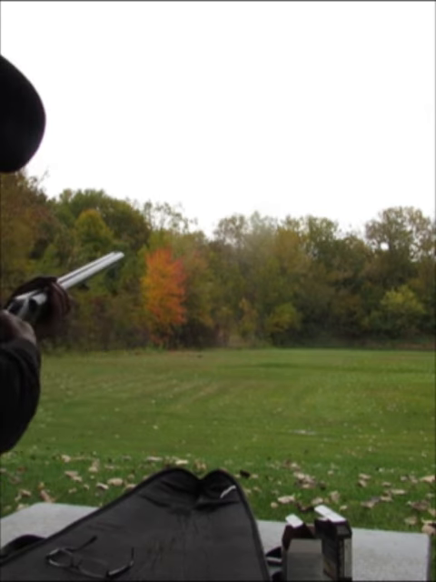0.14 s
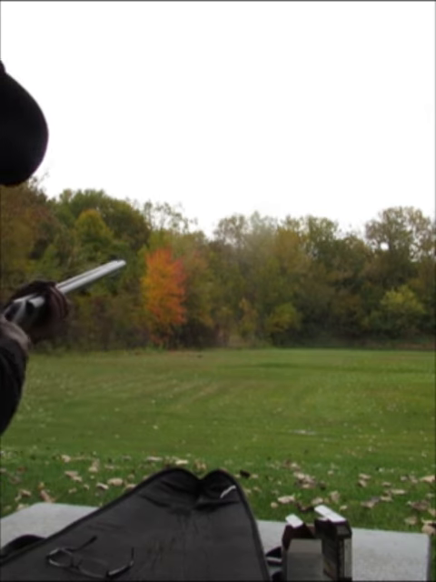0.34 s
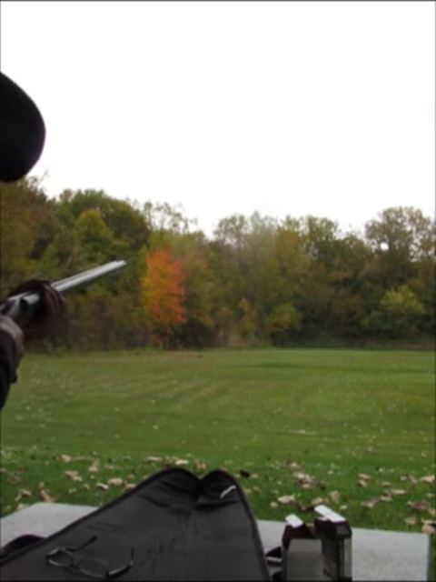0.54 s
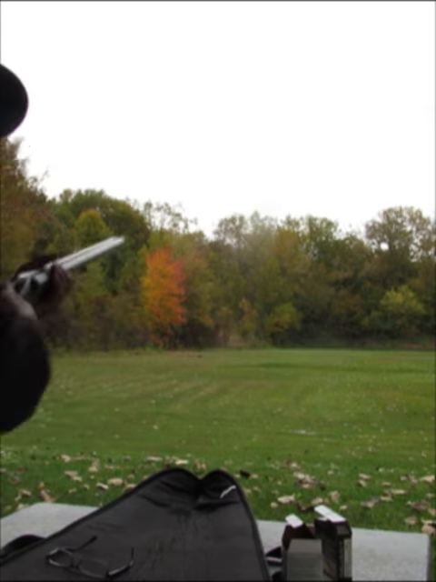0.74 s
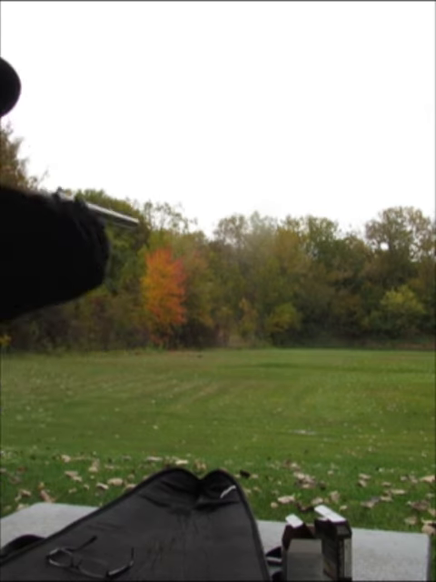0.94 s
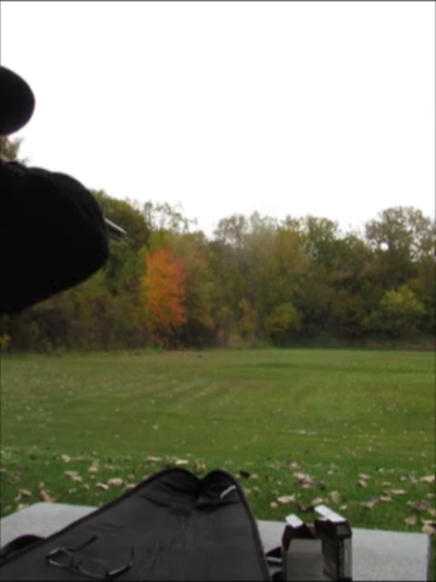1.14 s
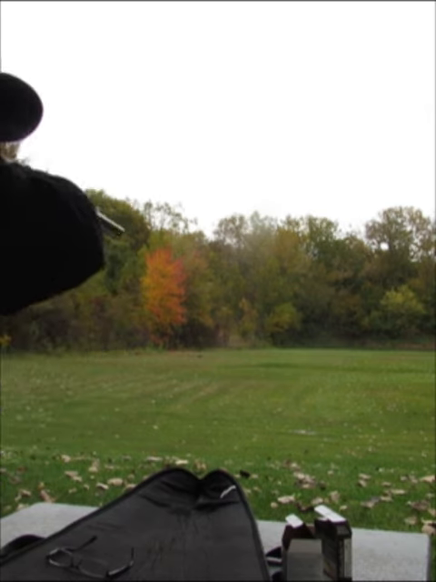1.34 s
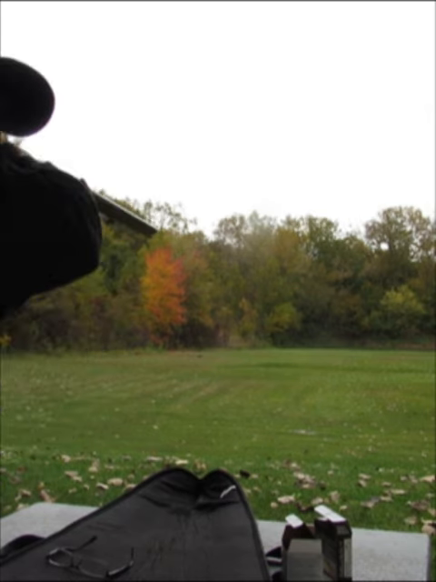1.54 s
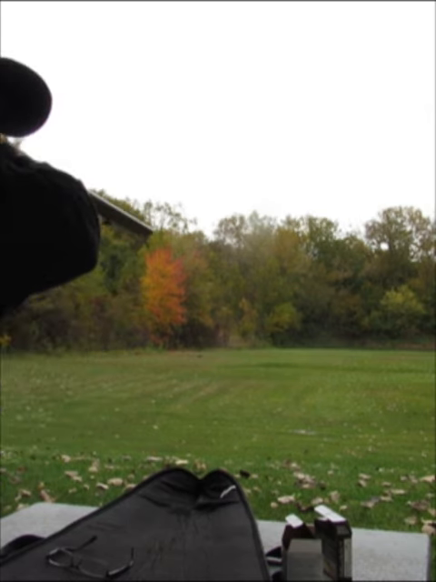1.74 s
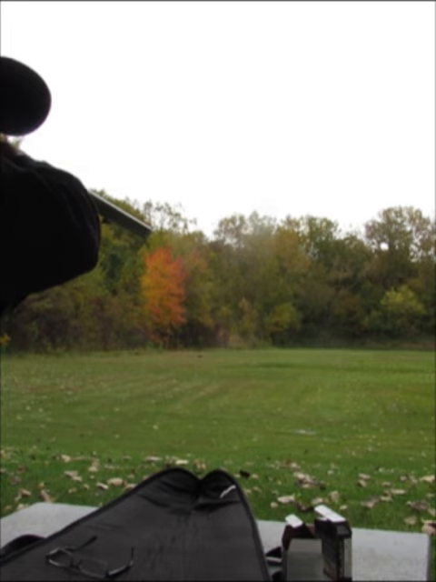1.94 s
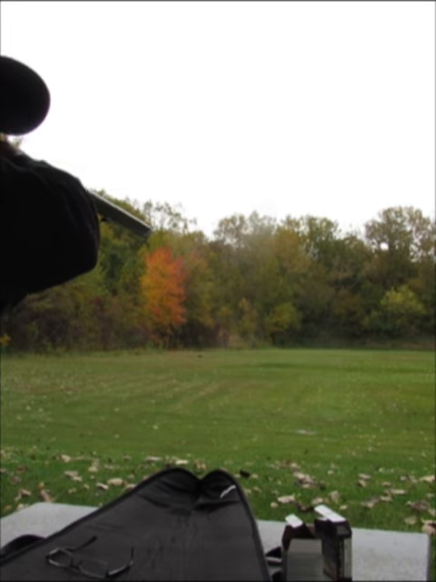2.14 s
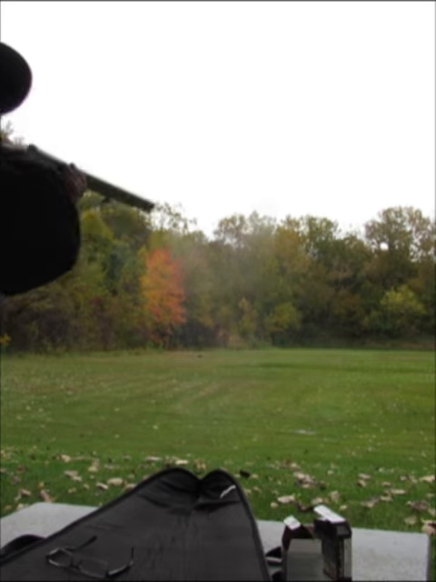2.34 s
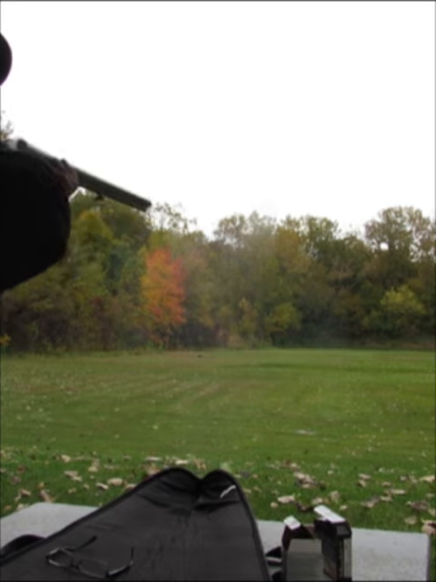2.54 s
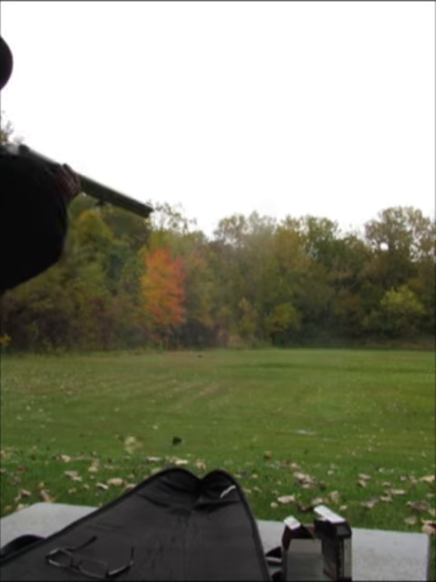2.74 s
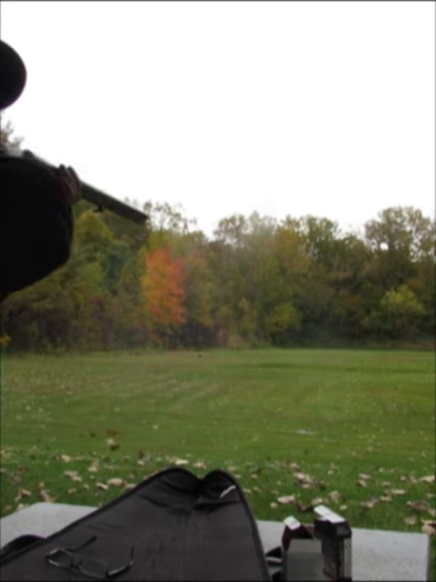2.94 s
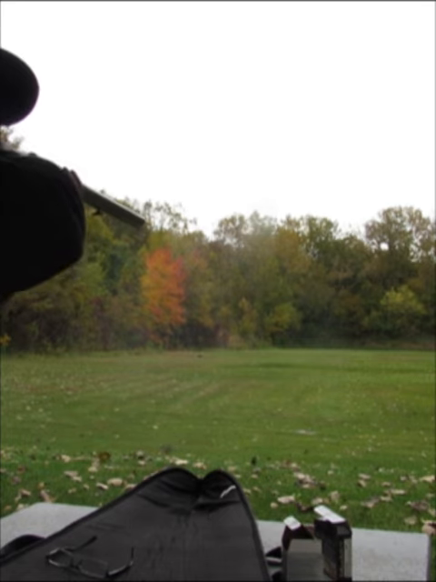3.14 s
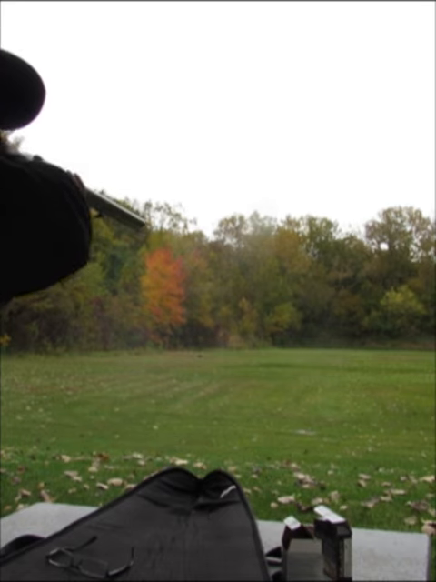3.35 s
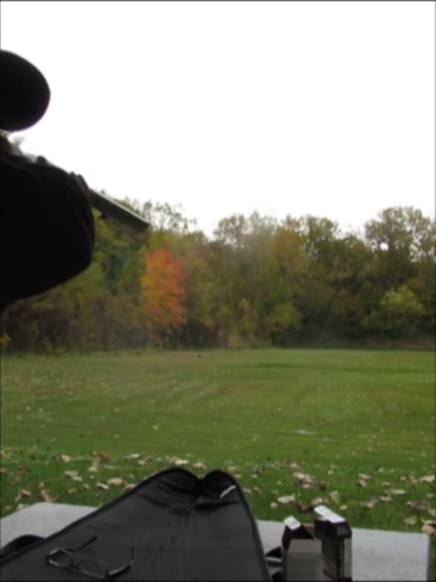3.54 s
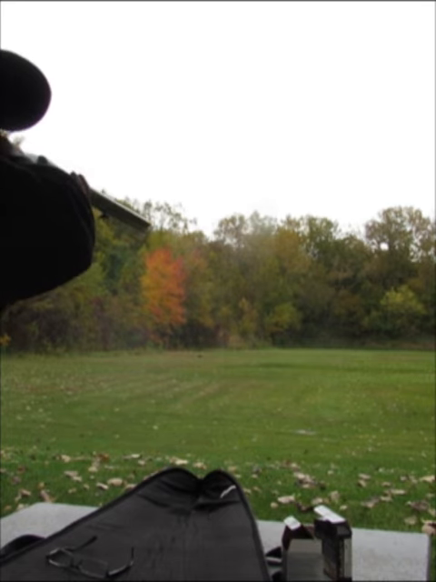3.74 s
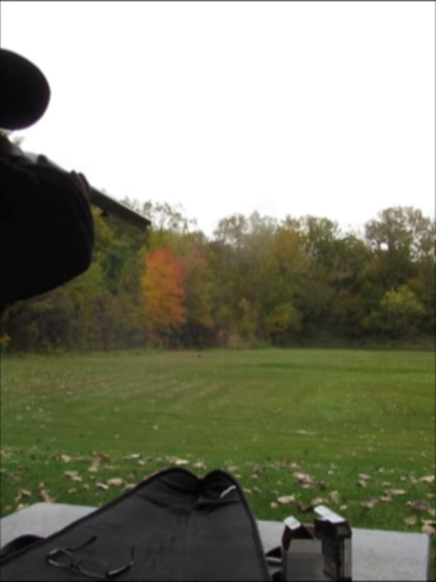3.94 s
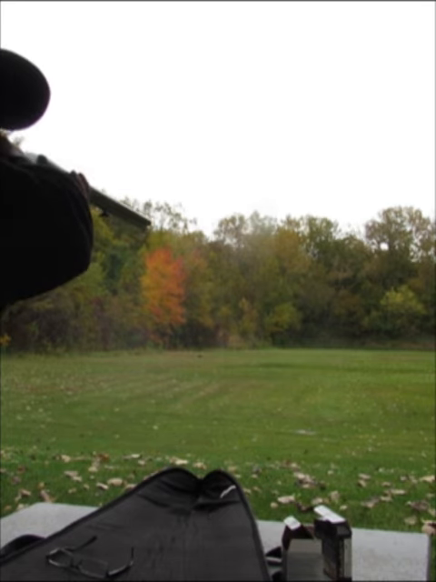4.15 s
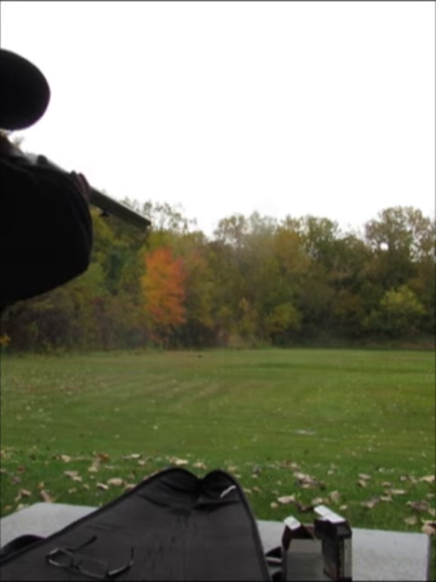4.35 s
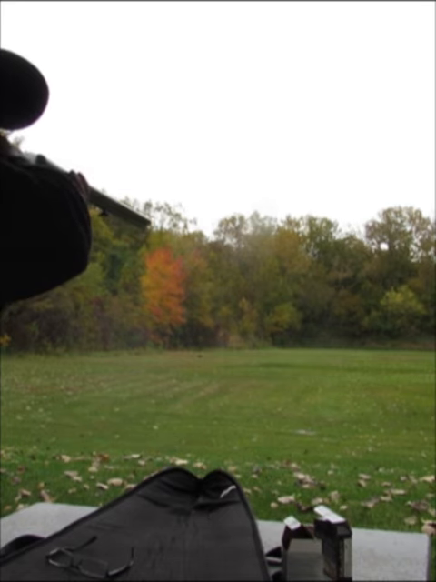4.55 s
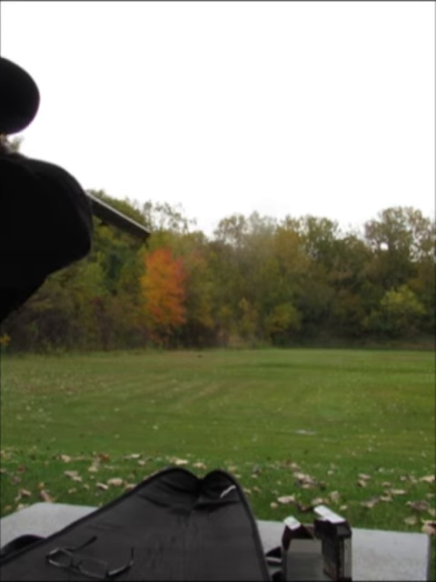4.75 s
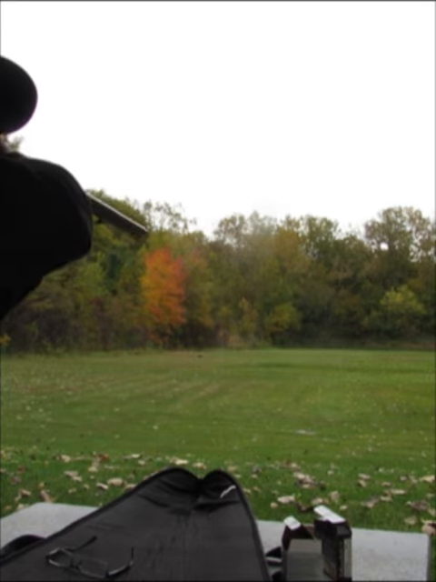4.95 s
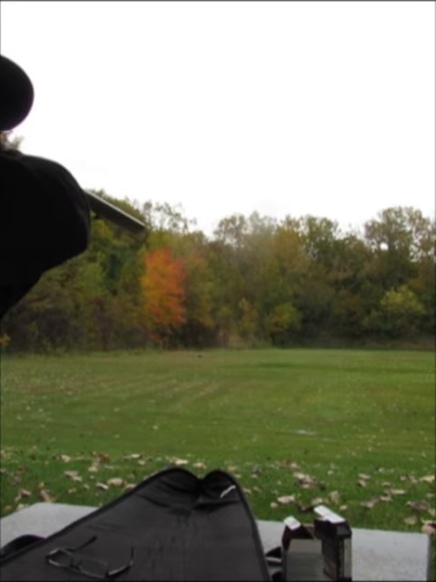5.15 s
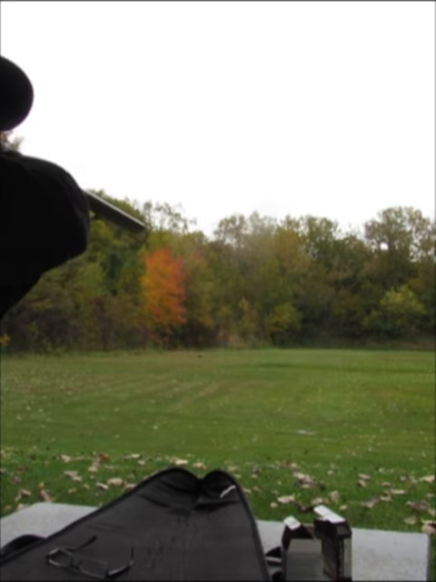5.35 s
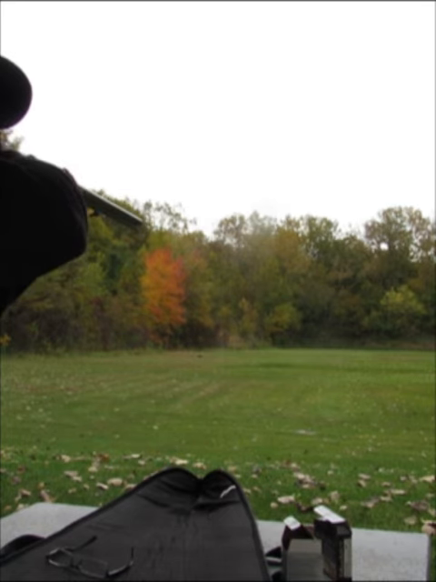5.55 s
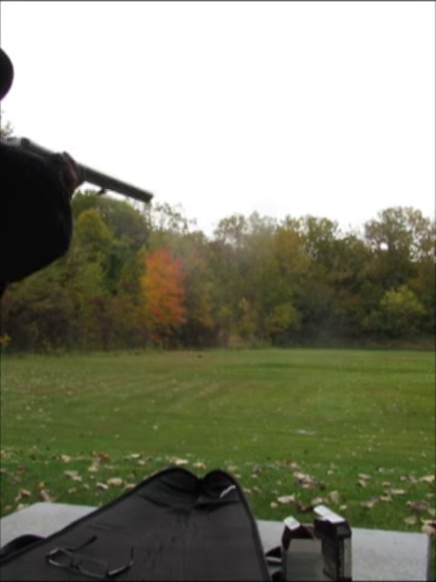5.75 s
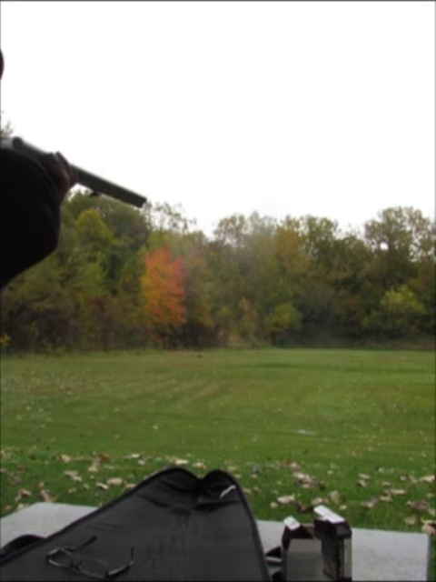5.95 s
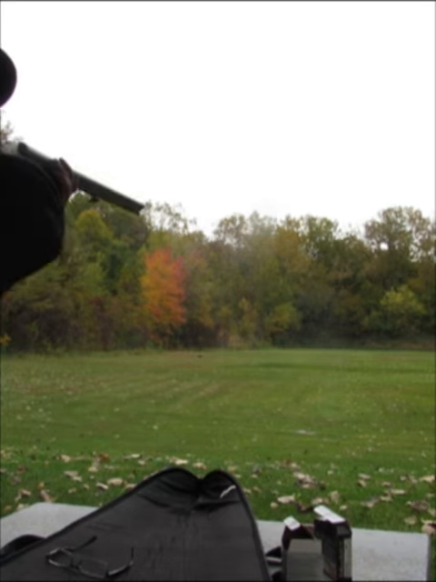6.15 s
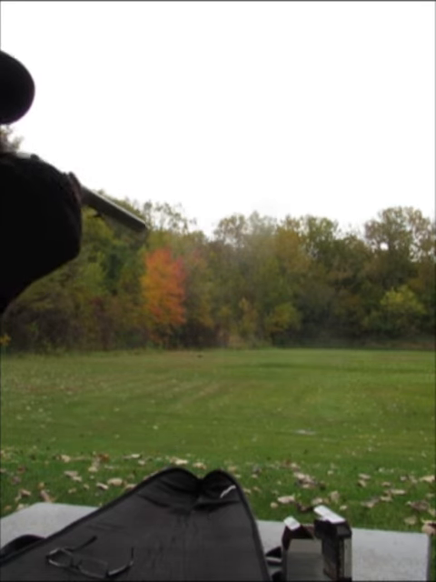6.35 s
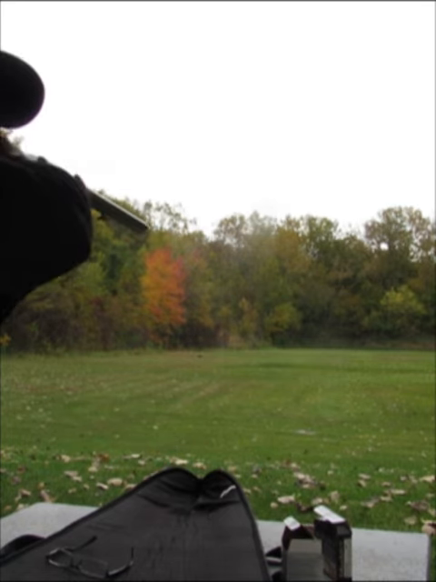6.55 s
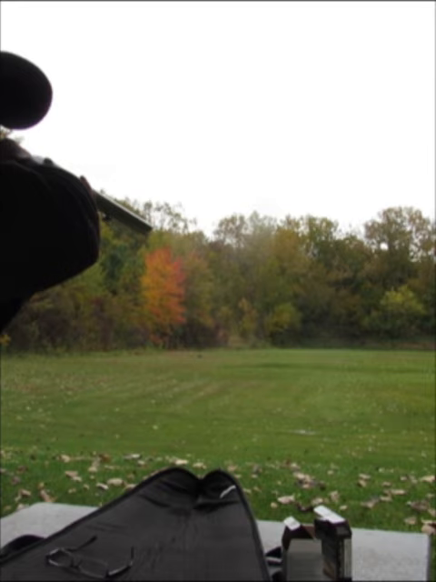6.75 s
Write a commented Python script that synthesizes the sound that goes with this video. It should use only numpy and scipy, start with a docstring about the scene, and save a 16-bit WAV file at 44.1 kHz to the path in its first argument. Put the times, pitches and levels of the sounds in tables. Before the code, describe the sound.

A gun's action clicks shut over rustling leaves, a shot blasts with a long tree echo, then two more shots follow outdoors.

```python
"""A long gun on a lawn ringed by trees: cloth scuffs, two hard clicks as the action snaps shut, more scuffs.
Over far rumble, rustling leaves and breeze on the microphone ports, a short silence, then one sliding bird
whistle. The first blast overloads the microphones, booms in the bench and returns as a long, dulling tree echo.
Faint ticks and a second short silence follow; the trigger squeaks into shot two, spent shells thud down, and
shot three ends the scene. Noise bands make air and echo, decaying sines the boom, sharp N-waves the cracks."""
import sys
import numpy as np
from scipy import signal
from scipy.io import wavfile

SR = 44100
rng = np.random.default_rng(int(sys.argv[2]) if len(sys.argv) > 2 else 0)


def materialize(psi):
    """Save the field psi as 16-bit PCM at rate SR to the path in sys.argv[1].

    A 1-D psi becomes a single channel; in a 2-D psi each row is a channel.
    """
    bounded = np.clip(np.atleast_2d(psi).T, -1, 1)
    quanta = np.round(bounded * 32767).astype(np.int16)
    wavfile.write(sys.argv[1], SR, quanta)


N = 303849
T = np.arange(N) / SR   # s
TINY = 1e-18   # inaudible offset that keeps filters off denormal numbers

# Levels are layer settings ahead of filters and later stages; likeness: -1 opposed, 0 unrelated, 1 same at both ports.
# Far rumble spectrum: hz, level_db (per Hz)
RUMBLE = [(30, -84), (70, -69.5), (130, -72), (250, -81), (500, -94.5)]
# Left-right likeness of the rumble: hz, likeness
RUMBLE_LIKENESS = [(30, .6), (500, 0.67)]
# Leaves and cloth between silences: start_s, start_db, end_db, tilt_db_per_octave (about 11 kHz)
RUSTLE = [(0, -65.5, -61, -1.6), (1.472, -67, -65.5, -1.16), (4.677, -67.5, -69, -1.5)]
# Rustle spectrum: hz, level_db (per Hz)
LEAVES = [(88, -37), (150, -11.5), (225, -13.5), (258, -16.5), (381, -15), (561, -19), (631, -29),
          (1040, -20), (1150, -25), (2760, -31.5), (10500, -41), (13000, -35.5), (15500, -83.5)]
# Left-right likeness of the rustle: hz, likeness
LEAF_LIKENESS = [(60, -0.82), (130, -0.68), (290, -0.37), (640, -0.01), (1410, 0.39), (3100, 0.8),
                 (6820, 0.31), (15000, 0.01)]
# Faint peaks in the hiss: hz, width_hz, level_db
COLOUR = [(1590, 100, -42), (2750, 170, -47)]
# Their swell: start_s, full_s
COLOUR_RISE_S = (0.73, 0.8)
# Breeze on the ports over time: time_s, level_db (per Hz)
BREEZE = [(0, -58.5), (.55, -63.5), (.9, -57.5), (1.3, -54), (1.55, -52), (1.82, -60.5), (2.05, -55.5),
          (2.34, -59.5), (3.4, -59.5), (4.2, -61.5), (4.6, -51), (4.68, -61.5), (5.1, -58), (5.7, -60),
          (6.4, -65.5), (6.89, -48)]
# Breeze spectrum: hz, level_db (relative)
GUST = [(12, -43), (20, -17), (65, -2.5), (112, -1.5), (157, -14.5), (248, -25.5), (500, -40.5), (650, -70),
        (1100, -120)]
# Left-right likeness of the breeze: hz, likeness
GUST_LIKENESS = [(25, -.85), (100, -.7), (400, -.3)]
# Single eddies thumping the ports: middle_s, level_db, pitch_hz, length_s, opposed_share
BUFFETS = [(1.5, -22.5, 87.5, 0.077, 4.3), (1.597, -37, 90, 0.031, 4.9), (1.663, -39, 90, 0.034, 5.8),
           (1.922, -33.5, 77, 0.044, 11), (2.048, -36.5, 70, 0.036, 9.1), (2.092, -27.5, 70, 0.017, 7.2),
           (3.772, -35.5, 85, 0.03, 3), (4.099, -53, 70, .04, 3), (4.5, -46.5, 70, 0.045, 4.9),
           (4.564, -45.5, 70, 0.044, 4.7), (4.61, -37, 95, 0.037, 2.2), (4.837, -35, 80, 0.039, 4.8),
           (5.464, -46, 60, .04, 4), (6.7, -46, 70, .04, 4)]
# Bird whistle: time_s, pitch_hz, level_db
BIRD = [(1.48, 3420, -72), (1.55, 3350, -68), (1.59, 3300, -74), (1.62, 3250, -61), (1.68, 3160, -69),
        (1.78, 3030, -80)]
# Trigger squeak: time_s, slips_per_s, level_db
SQUEAK = [(5.6, 958, -72), (5.635, 964, -62), (5.645, 965, -55), (5.714, 965, -56)]
# Its partials: multiple_of_slip_rate, level_db (relative)
SQUEAK_ORDERS = [(3, -18), (4, 1), (5, -20), (6, -20), (7, -19), (8, -10), (10, -18)]
# Faint ticks: start_s, level_db
TICKS = [(3.959, -65), (4.045, -64), (4.2, -71.5), (4.33, -65.5), (4.378, -61.5), (4.53, -63), (4.7, -55),
         (4.73, -54), (4.8, -58), (4.94, -58), (5.105, -56), (5.345, -54)]
# Scuffs of hands and cloth: start_s, dull_db, bright_db, t60_s
SCUFFS = [(0, -29.5, -42.5, 0.26), (.29, -60, -54, .15), (.735, -31, -60, .2), (.756, -28, -38, 0.094),
          (.776, -36, -51, .08), (.935, -32, -41.5, 0.18), (.905, -36, -60, .1), (1.04, -46, -49, 0.33),
          (1.12, -32, -56, .1), (6.69, -51.5, -49, 0.11)]
# Resonances of the dull part: hz, width_hz, level_db (relative)
DULL = [(970, 260, -0.5), (1690, 400, -1), (2800, 350, -7)]
# Resonances of the bright part: hz, width_hz, level_db (relative)
BRIGHT = [(4900, 900, 2), (6750, 1700, 1.5), (9900, 3500, -5)]
# The action snaps shut: start_s, level_db, t60_s (of the rattle)
LATCH = [(0.4555, -15.5, 0.17), (0.4607, -16.5, 0.24)]
# Resonances of the steel action: hz, width_hz, level_db (relative)
ACTION = [(450, 210, -9.5), (1030, 245, -4.5), (1770, 300, 0), (3730, 1200, -5.5), (5470, 800, -0.5),
          (6670, 1600, -1.5), (9700, 590, -4.5), (13600, 1900, -7)]
# Spent shells thudding down: start_s, level_db, pitch_hz
KNOCKS = [(5.993, -31, 249), (6.202, -24, 470), (6.262, -33.5, 526), (6.513, -28.5, 482)]
# Echo spectrum: hz, level_db (relative)
ECHO = [(60, -16), (130, -2), (300, -1), (600, 1.5), (1300, 1), (2200, 2.5), (3500, -0.5), (6000, 2),
        (10000, 1), (15000, -10)]
# Left-right likeness of the echo: hz, likeness
ECHO_LIKENESS = [(60, 0.08), (130, 0.69), (290, 0.87), (640, 0.8), (1410, 0.86), (3100, 0.94), (6820, 0.76),
                 (15000, 0.2)]
# Echo balance: hz, left_minus_right_db
ECHO_BALANCE = [(60, -4.5), (180, -7), (550, -4), (1650, 0), (4970, -1), (15000, 1)]
# Bench modes: pitch_hz, level_db (relative), t60_s
BENCH = [(126.5, -7.5, 0.67), (139.4, -4, 0.45), (207, -9.5, 0.58), (242.5, -10, 0.41), (269.4, -4, 0.44),
         (294.8, -1.5, 0.44), (335.5, 3.5, 0.28), (394.4, -10.5, 0.3), (455, -12, .35), (528, -11.5, .25),
         (609, -18, 0.11)]
# Near reflections of a blast: hz, level_db (per Hz, relative), t60_s (before the shot's decay_scale)
BLAST = [(25, -18, 0.33), (60, -15.5, .5), (250, 5.5, .4), (574, 0, 0.2), (1510, 0.5, 0.39),
         (3023, -12.5, 0.34), (7200, -10, 0.32), (15000, -13.5, 0.25)]
# Left-right likeness of the blast: hz, likeness
BLAST_LIKENESS = [(25, -.85), (60, -.3), (120, .5), (700, .4), (1300, .8), (2400, .95), (4400, .9),
                  (8100, .5), (15000, .3)]
# Shots: start_s, blast_db, first_front_db, front_crack_db, bench_boom_db, deepest_modes_db, boom_swell_s,
# boom_return_db, decay_scale, left_minus_right_db, echo_db (per Hz), echo_treble_db, echo_bass_db, echo_depth_db;
# front, crack and boom are relative to blast_db
SHOTS = [(2.3568, -5.5, 9.5, 12, -4, 0, 0.075, 7, 1, 1, -60, -9.5, -2, 4),
         (5.7147, -6, -6, 7, -5, -2.5, 0.052, 0.5, 0.93, -0.5, -70, -5, 3, -5),
         (6.8332, -6.5, -11, -5, -4, 8, 0.062, 2, 0.66, 0.5, -69, -7, 5.5, -1.5)]
# Brief silences: start_s, end_s
DROPOUTS = [(1.462, 1.472), (4.667, 4.678)]

# After a shot the background sinks, then recovers; the tilt is dB per octave per dB sunk
SINK_DB, SINK_S, RECOVER_DB_PER_S, SINK_TILT = 17.5, .25, 4.5, 0.27
PUSH_DB, PUSH_HZ, PUSH_S = -14.5, 90, .03   # each blast shoves the two ports apart
TICK_HZ, TICK_WIDTH_HZ, TICK_T60_S = 7000, 4700, 0.054
SCUFF_ATTACK_S = 0.0058
# The echo fades slowly until the far trees answer, then fast
ECHO_RISE_S, ECHO_FADE_DB_PER_S, FAR_TREES_S, LATE_FADE_DB_PER_S = 0.065, 6.5, 1.18, 15
AIR_DB_PER_S, FAR_TREES_DB, FAR_TREES_WIDTH_S = 19.5, 7.5, 0.15   # treble loss; brighter far answer
NEAR_BASS_DB, NEAR_BASS_S, BASS_GAIN_DB_PER_S = 19.5, 0.17, 2   # bassy early returns; bass outlasts mids
BASS_KNEE_HZ = 300   # below it each echo has a depth of its own
BOOM_DIP_S, BOOM_DIP_WIDTH_S, BOOM_DIP_DEPTH = 0.1404, .01, 0.78   # the boom dips briefly, then returns
FRONT_HZ, FRONT_T60_S, FRONT_CRACK_S = 700, .02, 0.00051   # dull first front; its crack comes this late
REBOUND_S = .0044   # the bright main wave follows the first front by this much
ROAR_PER_HZ_DB, ROAR_HOLD_S = -36, 0.055   # near reflections relative to the blast; longest hold
# The main wave: five jumps, each weaker; gap and length vary by chance
CRACK_DB, CRACK_LOSS_DB, CRACK_GAP_S, CRACK_S = 12.5, 2.2, .00035, 0.00023
OVERLOAD, HARDNESS, SQUEEZE_S = .55, 4, .005   # strained ceiling, sharpness of its knee, smoothing time
TREBLE_HZ, TREBLE_LIFT = 2934, 0.11
NOTCH_HZ, NOTCH_WIDTH_HZ, NOTCH_DEPTH = 684, 165, .63
CUTOFF_HZ = 15700


def from_db(db):
    """Gain of a level."""
    return 10 ** (np.asarray(db) / 20)


def in_time(rows):
    """Columns of a table, drawn as straight lines over time."""
    s, *columns = np.transpose(rows)
    return [np.interp(T, s, column) for column in columns]


def at_hz(points, hz, axis=1):
    """A column of a table read on a log-frequency axis."""
    points = np.array(points)
    return np.interp(np.log(hz), np.log(points[:, 0]), points[:, axis])


def drift(rate):
    """A smooth random curve of spread about 1; a higher rate wanders faster."""
    r = np.exp(-80 * np.pi * rate / SR)   # computed at every 40th sample
    slow = signal.lfilter([1], [1, -2 * r, r * r], rng.standard_normal(N // 40 + 2002))[2000:]
    return np.interp(np.arange(N) / 40, np.arange(len(slow)), slow / slow.std())


def pan(x, db):
    """Left louder than right by db."""
    return x * from_db(np.array([[.5], [-.5]]) * db)


def resonance(x, hz, width_hz):
    """A two-pole resonance with a peak gain of about 1."""
    r = np.exp(-np.pi * width_hz / SR)
    poles = [1, -2 * r * np.cos(2 * np.pi * hz / SR), r * r]
    return signal.lfilter([(1 - r * r) / 2, 0, (r * r - 1) / 2], poles, x)


def resonances(x, peaks, lift_db=0):
    """Parallel resonances with alternating sign."""
    return sum((-1) ** k * from_db(db + lift_db) * resonance(x, hz, width)
               for k, (hz, width, db) in enumerate(peaks))


def dying(s, t60):
    """An envelope that starts at s and falls 60 dB in t60."""
    return (T >= s) * from_db(-60 * np.maximum(T - s, 0) / t60)


def bands(gain_at, likeness, lowest, count, size=2, order=2):
    """Bands of stereo noise, size to the octave, unit power per Hz, each times gain_at(hz)."""
    out = 0
    white = rng.standard_normal((2, 2, N)) * np.sqrt(SR / 2)
    edges = np.minimum(lowest * 2 ** (np.arange(count + 1) / size), .45 * SR)
    for k, (low, high) in enumerate(zip(edges, edges[1:])):
        band = signal.butter(order, [low, high], "band", fs=SR, output="sos")
        mid, side = signal.sosfilt(band, white[k % 2])   # neighbours use separate noise
        hz = np.sqrt(low * high)
        alike = np.clip(at_hz(likeness, hz), -1, 1)
        pair = np.sqrt(.5 + alike / 2) * mid + np.sqrt(.5 - alike / 2) * side * [[1], [-1]]
        out = out + gain_at(hz) * pair
    return out


def near_noise(side_share):
    """White noise, mostly the same at both ports."""
    white = rng.standard_normal((2, N))
    return white[0] + side_share * white[1] * [[1], [-1]]


def thump(s, hz, length):
    """A low cosine under a smooth window centred on s."""
    window = np.cos(np.pi * np.clip((T - s) / length, -.5, .5)) ** 2
    return window * np.cos(2 * np.pi * hz * (T - s))


def n_wave(s, length):
    """A pressure wave that jumps, ramps through zero and jumps back."""
    phase = (T - s) / length
    return (phase >= 0) * (phase < 1) * (2 * phase - 1)


def tone(rows, orders, jitter):
    """Partials on a wavering pitch, faded in and out at the ends of the table."""
    hz, db = in_time(rows)
    turns = np.cumsum(hz * (1 + jitter * drift(60))) / SR
    fade = np.clip(np.minimum(T - rows[0][0], rows[-1][0] - T) / 0.0064, 0, 1)
    partials = sum(from_db(order_db) * np.sin(2 * np.pi * order * turns) for order, order_db in orders)
    return np.sqrt(2) * fade * from_db(db) * partials


def quiet_again(s):
    """End of the first silence after s, or the end of everything."""
    return min([end for _, end in DROPOUTS if end > s] + [N / SR])


def sinking():
    """Background drop in dB: down after each shot, slowly back, whole after a silence."""
    sunk_db = np.zeros(N)
    for s, *_ in SHOTS:
        falling = SINK_DB * (T - s) / SINK_S
        recovering = SINK_DB - RECOVER_DB_PER_S * (T - s - SINK_S)
        sunk_db = np.maximum(sunk_db, np.minimum(falling, recovering) * (T < quiet_again(s)))
    return sunk_db


def rumble():
    """Low noise from far off, steady but for sinking after the shots."""
    noise = bands(lambda hz: from_db(at_hz(RUMBLE, hz)), RUMBLE_LIKENESS, 30.0, count=8)
    return from_db(-sinking()) * noise


def rustle():
    """Leaves and cloth: many tiny rubs heard as hiss, made patchy by a separate drift in every band."""
    ends = [row[0] for row in RUSTLE[1:]] + [N / SR]
    points = []
    for (s, start_db, end_db, slope), end in zip(RUSTLE, ends):
        points += [(s, start_db, slope), (end - 1 / SR, end_db, slope)]
    level_db, tilt = in_time(points)
    sunk_db = sinking()
    level_db = level_db - sunk_db
    tilt = tilt + SINK_TILT * sunk_db

    def gain_at(hz):
        """Level of one band with its own flutter."""
        return from_db(level_db + at_hz(LEAVES, hz) + tilt * np.log2(hz / 11000) + drift(30.08))
    return bands(gain_at, LEAF_LIKENESS, 125.0, count=21, size=3)


def colour():
    """Narrow, wavering noise peaks that swell in and stop at the first silence."""
    start, full = COLOUR_RISE_S
    swell = np.clip((T - start) / (full - start), 0, 1) * (T < DROPOUTS[0][1])
    white = near_noise(side_share=0.19) * swell
    return sum(from_db(db + 2.8 * drift(8)) * resonance(white + TINY, hz, width) for hz, width, db in COLOUR)


def breeze():
    """Eddies push the ports mostly in opposite directions, in lumps and thumps; each blast shoves them too."""
    level_db, = in_time(BREEZE)
    level_db = level_db - sinking() + 3.5 * drift(14) + 1.5 * drift(2.2)
    out = bands(lambda hz: from_db(level_db + at_hz(GUST, hz)), GUST_LIKENESS, 18.0, count=9)
    for s, db, hz, length, opposed in BUFFETS:
        out += from_db(db) * thump(s, hz, length) * np.array([[1 + opposed], [1 - opposed]])
    for s, *_ in SHOTS:
        out += from_db(PUSH_DB) * thump(s + PUSH_S / 2, PUSH_HZ, PUSH_S) * np.array([[1], [-1]])
    return out


def bird():
    """One falling whistle: a single sine on a slightly wavering pitch."""
    return tone(BIRD, [(1, 0)], jitter=0.0078)


def ticks(white):
    """Faint ticks: dying noise bursts through one broad high resonance."""
    burst = white * sum(from_db(db) * dying(s, TICK_T60_S) for s, db in TICKS)
    return resonance(burst + TINY, TICK_HZ, TICK_WIDTH_HZ)


def scuffs():
    """Friction of hands and cloth: soft, rattling noise with a dull and a bright part, and faint ticks."""
    white = near_noise(side_share=0.2) * from_db(1.9 * drift(90)) + TINY
    out = ticks(white)
    for k, peaks in enumerate((DULL, BRIGHT)):
        envelope = sum(from_db(levels_db[k]) * dying(s, t60) * np.clip((T - s) / SCUFF_ATTACK_S, 0, 1)
                       for s, *levels_db, t60 in SCUFFS)
        out = out + resonances(white * envelope + TINY, peaks)
    return out


def latch():
    """Two hard contacts and their rattle, noise bursts coloured by the steel action."""
    envelope = sum((dying(s, 0.011) + 0.21 * dying(s, t60)) * from_db(db) for s, db, t60 in LATCH)
    return resonances(envelope * near_noise(side_share=0.14) + TINY, ACTION, lift_db=4)


def squeak():
    """The trigger sticks and slips: strong harmonics of a wavering slip rate."""
    return tone(SQUEAK, SQUEAK_ORDERS, jitter=0.0045)


def knocks():
    """Spent shells landing: short dull dying sines, louder on the right."""
    return sum(pan(from_db(db) * dying(s, 0.058) * np.sin(2 * np.pi * hz * (T - s)), -5.0)
               for s, db, hz in KNOCKS)


def tree_echo():
    """Countless late returns as noise; air dulls them with distance, and each shot's echo replaces the last."""
    level_db, treble_db, bass_db, depth_db, sounding = np.zeros((5, N))
    for s, *_, echo_db, bright_db, low_db, deep_db in SHOTS:
        on = T >= s
        t = T[on] - s
        slow_fade_db = ECHO_FADE_DB_PER_S * np.minimum(t, FAR_TREES_S)
        late_fade_db = LATE_FADE_DB_PER_S * np.maximum(t - FAR_TREES_S, 0)
        far_answer_db = FAR_TREES_DB * np.exp(-((t - FAR_TREES_S) / FAR_TREES_WIDTH_S) ** 2)
        level_db[on] = echo_db - slow_fade_db - late_fade_db
        treble_db[on] = bright_db - AIR_DB_PER_S * t + far_answer_db
        bass_db[on] = low_db + NEAR_BASS_DB * np.exp(-t / NEAR_BASS_S) + BASS_GAIN_DB_PER_S * t
        depth_db[on] = deep_db
        sounding[on] = np.clip(t / ECHO_RISE_S, 0, 1) * (t + s < quiet_again(s))
    swell = drift(5)   # shared by all bands

    def gain_at(hz):
        """Level per Hz, bent up or down on either side of 1.3 kHz."""
        if hz > 1300:
            bend = treble_db * ((hz - 1300) / 3300) ** 0.79
        else:
            bend = bass_db * min(np.log2(1300 / hz) / 2, 1)
            bend = bend + depth_db * np.clip(2 * np.log2(BASS_KNEE_HZ / hz), 0, 1)
        db = level_db + at_hz(ECHO, hz) + bend + .6 * swell + .9 * drift(14)
        return pan(sounding * from_db(db), at_hz(ECHO_BALANCE, hz))
    return bands(gain_at, ECHO_LIKENESS, 59.46, count=33, size=4, order=3)


def bench():
    """Modes swell while near reflections pile up, the deepest later, then ring down; own phase per side."""
    boom = np.zeros((2, N))
    chance = rng.random((len(SHOTS), len(BENCH), 3))
    for (s, db, _, _, boom_db, deep_db, swell_s, return_db, *_), draws in zip(SHOTS, chance):
        span = slice(int(s * SR), int((s + 1) * SR))
        t = T[span] - s
        from_dip = (t - BOOM_DIP_S) / BOOM_DIP_WIDTH_S
        dip = 1 - BOOM_DIP_DEPTH * np.exp(-from_dip ** 2)
        dip = dip * from_db(return_db * np.clip(.5 + from_dip, 0, 1))
        for (hz, mode_db, t60), (start, skew, late) in zip(BENCH, draws):
            deep = hz < 160
            top_s = swell_s * (0.83 + 0.28 * late + .3 * deep)
            ring = from_db(-60 * np.maximum(t - top_s, 0) / t60)
            shape = dip * np.clip(t / top_s, 0, 1) ** 1.8 * ring
            lead = (.4 + .7 * skew) * np.array([[.5], [-.5]])   # rad
            gain = from_db(db + boom_db + deep_db * deep + mode_db)
            boom[:, span] += gain * shape * np.sin(2 * np.pi * (hz * t + start) + lead)
    return boom


def roar():
    """Dense near reflections as noise that holds briefly, then dies band by band, treble first to start."""
    rises = [np.clip((T - s) / REBOUND_S, 0, 1) ** .8 for s, *_ in SHOTS]
    grain = drift(120)   # single strong reflections make the roar uneven

    def gain_at(hz):
        """All shots in one band."""
        fading = 0
        hold_s = ROAR_HOLD_S * min(1, 5000 / hz)
        for rise, (s, db, *_, scale, lr_db, _, _, _, _) in zip(rises, SHOTS):
            since = np.maximum(T - s - hold_s, 0)
            loss_db = 60 * since / (scale * at_hz(BLAST, hz, axis=2))
            fading = fading + pan(rise * from_db(db - loss_db + 1.6 * grain), lr_db)
        return fading * from_db(ROAR_PER_HZ_DB + at_hz(BLAST, hz))
    return bands(gain_at, BLAST_LIKENESS, 22.14, count=19)


def blasts():
    """Pressure fronts: a dull front with its crack, then five weakening N-waves, all over the roar."""
    out = roar()
    chance = rng.uniform(.6, 1.4, size=(len(SHOTS), 5, 2))
    for (s, db, front_db, crack_db, *_), draws in zip(SHOTS, chance):
        out -= from_db(db + front_db) * dying(s, FRONT_T60_S) * np.sin(2 * np.pi * FRONT_HZ * (T - s))
        out += from_db(db + crack_db) * n_wave(s + FRONT_CRACK_S, CRACK_S)
        for k, (gap, length) in enumerate(draws):
            start = s + REBOUND_S + CRACK_GAP_S * (k + gap - 1)
            out += from_db(db + CRACK_DB - CRACK_LOSS_DB * k) * n_wave(start, CRACK_S * length)
    return out


def scene():
    """Everything at the two ports, from the background to the gun."""
    background = rumble() + rustle() + colour() + breeze() + bird()
    handling = scuffs() + latch() + squeak() + knocks()
    return background + handling + tree_echo() + bench() + blasts()


def record(dry):
    """Overload, treble lift, a notch of the housing, brief silences, full scale and cut-off."""
    r = np.exp(-1 / (SQUEEZE_S * SR))
    strain = signal.lfilter([1 - r], [1, -r], np.minimum(np.abs(dry).max(axis=0) / 0.12, 1))
    # headroom shrinks a few ms into a loud sound
    ceiling = 1.15 - (1.15 - OVERLOAD) * np.clip(5 * strain - 3, 0, 1)
    x = dry / (1 + np.abs(dry / ceiling) ** HARDNESS) ** (1 / HARDNESS)
    x = x + TREBLE_LIFT * signal.sosfilt(signal.butter(1, TREBLE_HZ, "high", fs=SR, output="sos"), x)
    x = x - NOTCH_DEPTH * resonance(x, NOTCH_HZ, NOTCH_WIDTH_HZ)
    for start, end in DROPOUTS:
        x = x * np.clip(np.maximum(start - T, T - end) / 0.00061, 0, 1)
    x = signal.sosfilt(signal.butter(2, 20, "high", fs=SR, output="sos"), x)
    x = np.clip(x, -.93, .93)
    return signal.sosfilt(signal.cheby2(12, 55, CUTOFF_HZ, fs=SR, output="sos"), x)


dry = scene()
out = record(dry)
materialize(out)
```